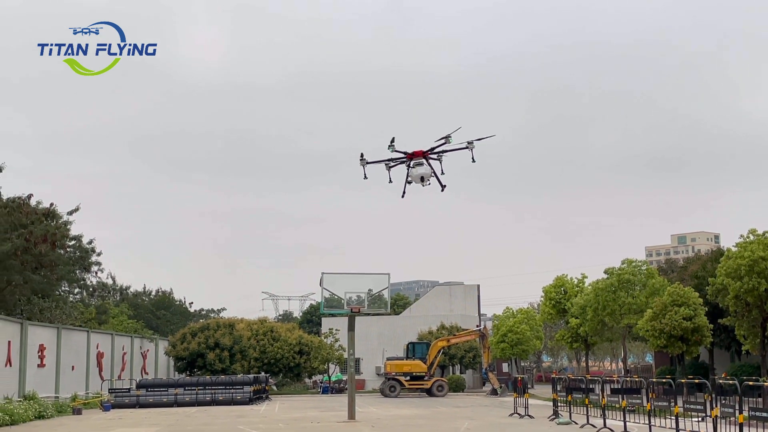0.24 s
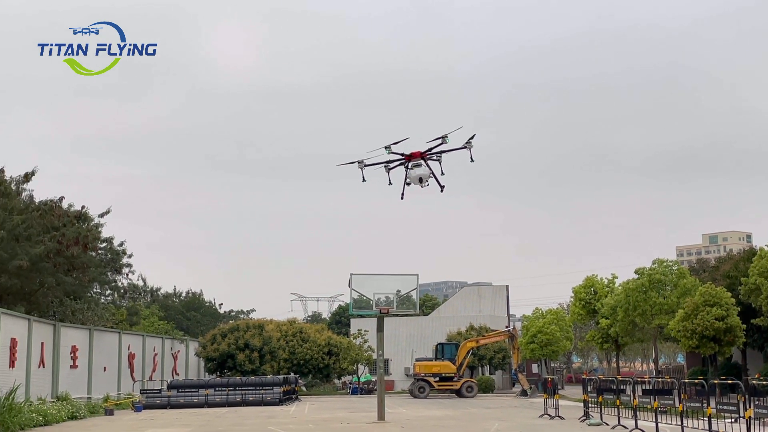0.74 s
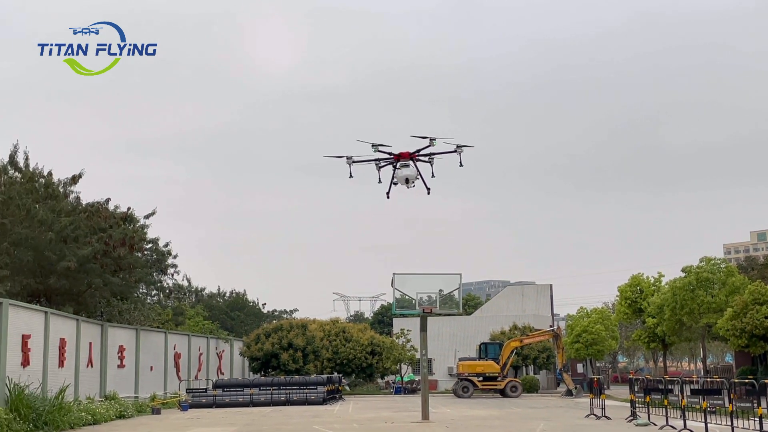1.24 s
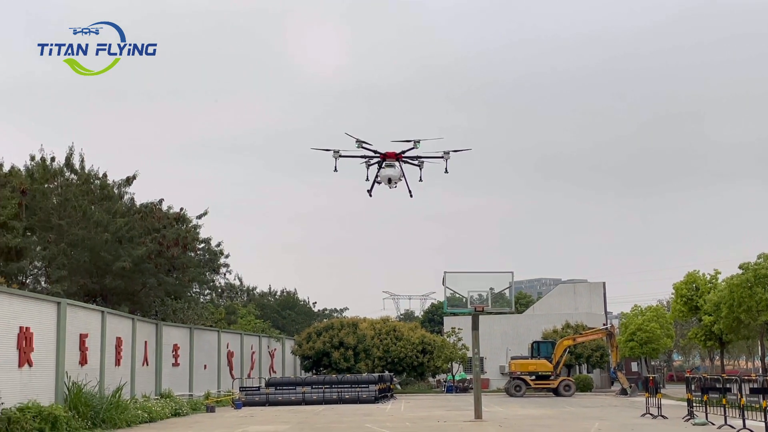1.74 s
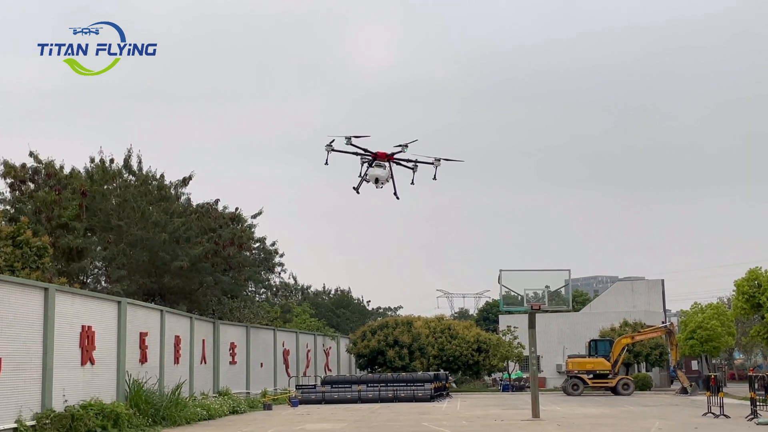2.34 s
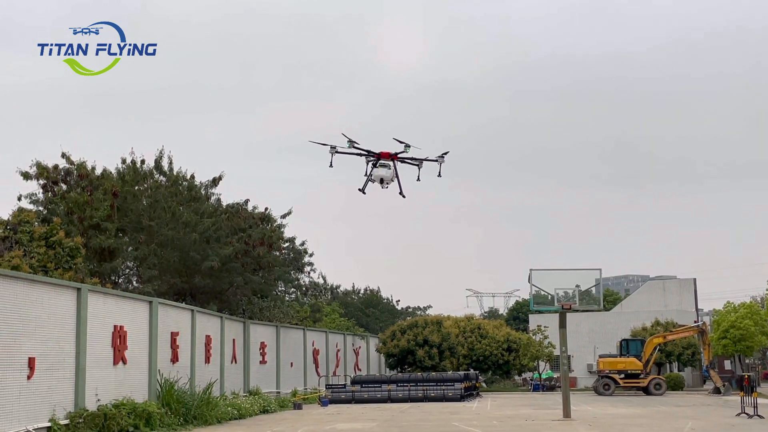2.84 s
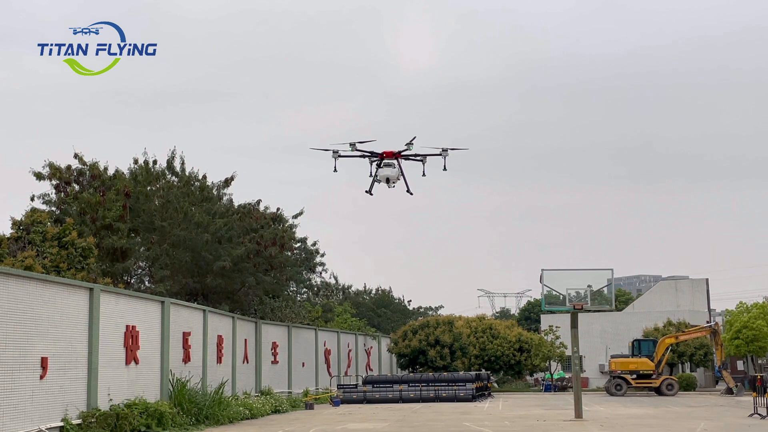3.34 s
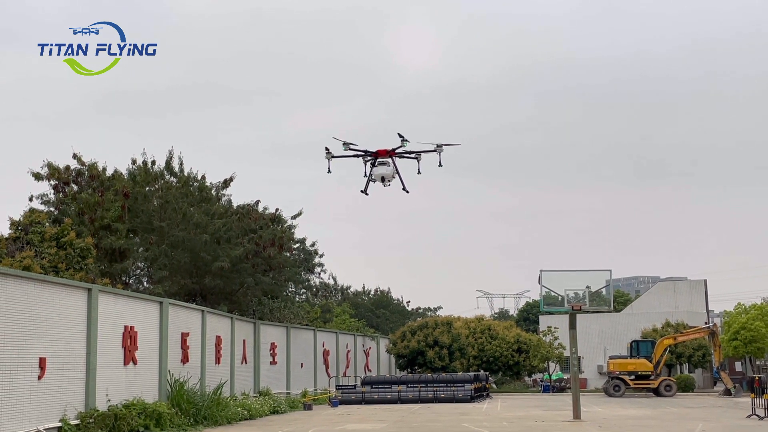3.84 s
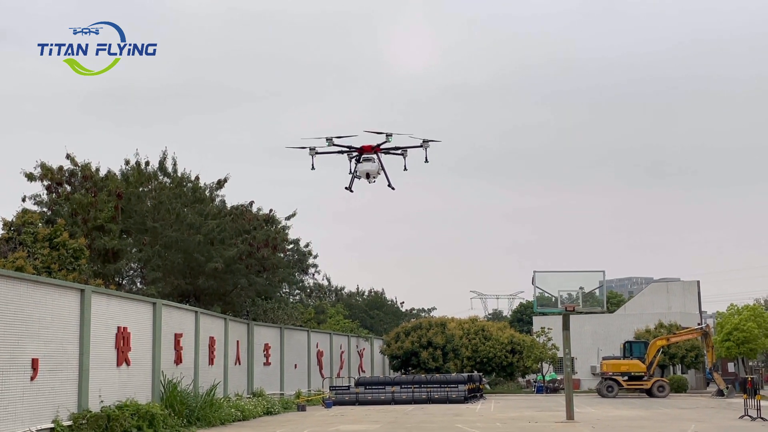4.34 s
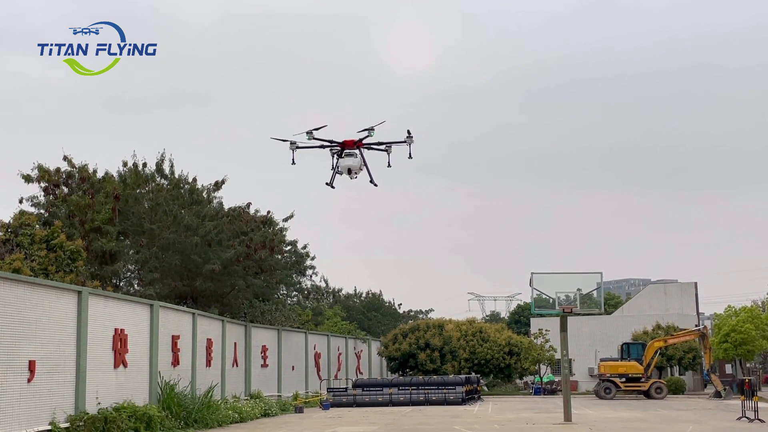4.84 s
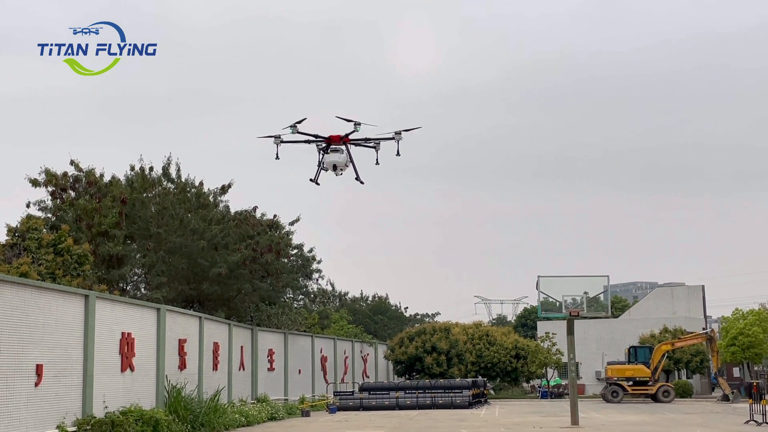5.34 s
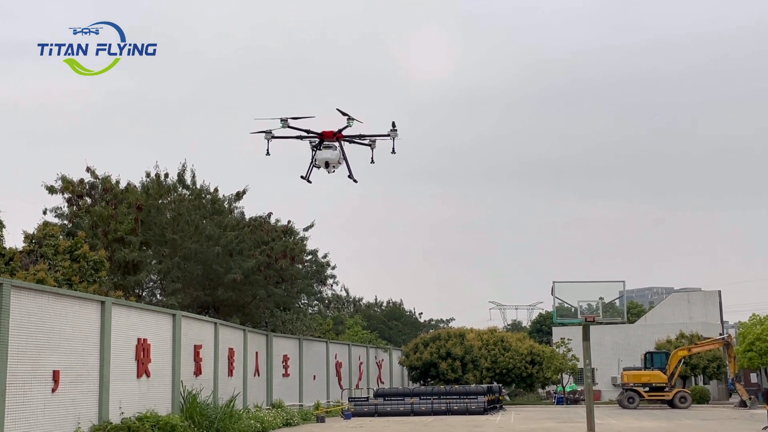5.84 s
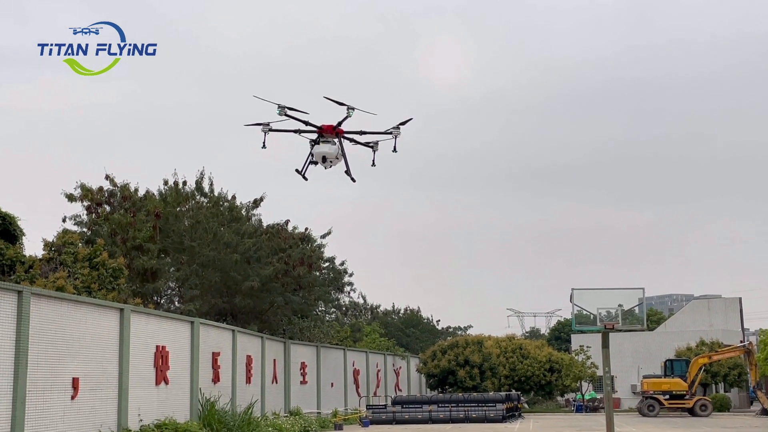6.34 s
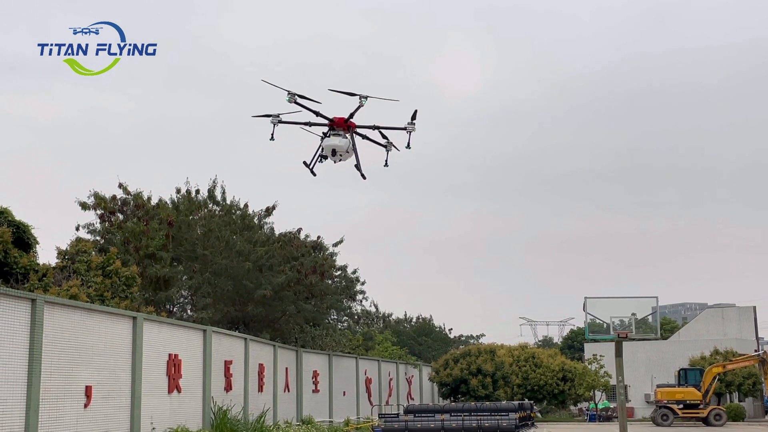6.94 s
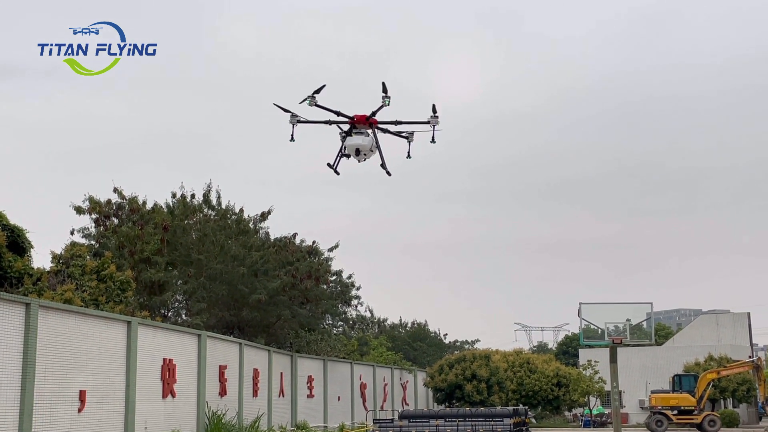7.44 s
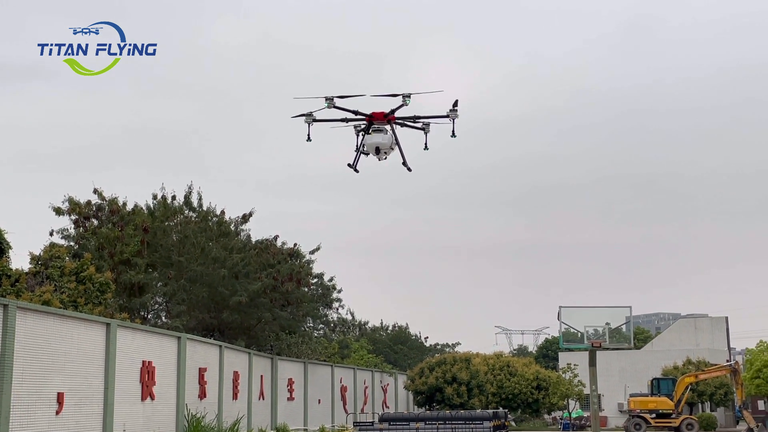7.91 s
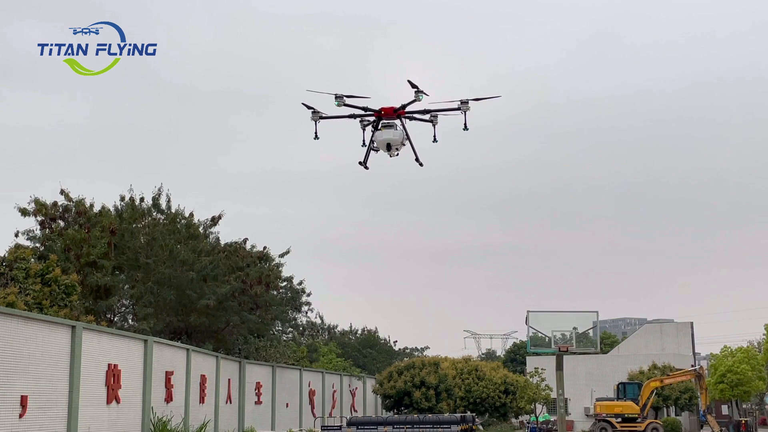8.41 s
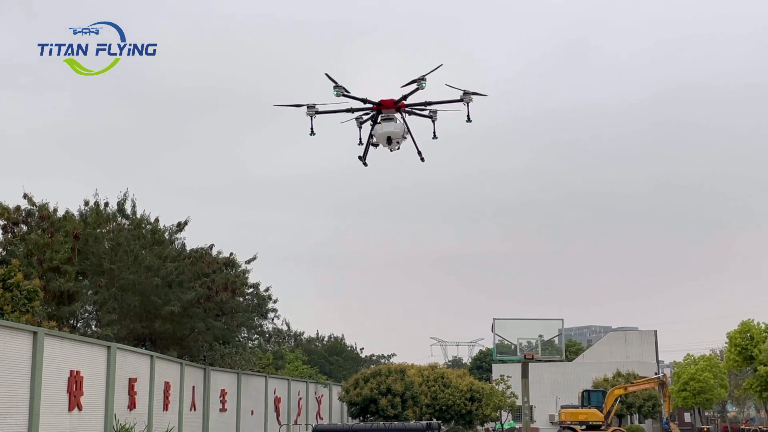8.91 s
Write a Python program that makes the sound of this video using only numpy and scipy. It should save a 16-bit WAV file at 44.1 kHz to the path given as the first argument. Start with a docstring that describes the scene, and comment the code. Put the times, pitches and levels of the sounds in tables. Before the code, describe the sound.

A six-rotor drone hovers over a paved yard, heard from the ground outdoors throughout. From 0 s there is a steady low hum near 57 blade beats per second, raspy buzz and airy swish, its rotors beating slowly against each other, with thin wavering motor whines and a very high electric whine. Soft wind gusts rumble at the start and around 1.6 s. Between 1 and 3 s the blade chop grows crisper and crackly; a tiny hollow blip passes at 2 s. From 2.6 to 3.2 s wind thumps the microphone in a cluster. From 3.3 to 5 s wind mostly calms and the buzz is softer, motor tones singing through. From 5.5 s the hum deepens and swells, with a rough pulsing roar strongest around 6.4 to 7.1 s, brief slaps, and wind thumps at 7.2 to 7.6 s. It stays close and full, chopping again near 8.7 s, still running at 9.2 s.

```python
"""A paved yard: a six-rotor spraying drone hovers low and drifts closer.
Each blade pass fires a pressure pulse for the rasp and hum, and shapes noise into swish, slaps and roar.
Rotor pairs at unequal speeds beat together; motors and drives add thin, gliding whines.
A delayed ground copy combs the buzz; noise and sharp pressure dips make wind rumble and thump on the mic."""
import sys
import numpy as np
from scipy import signal
from scipy.fft import rfft, irfft, next_fast_len
from scipy.io import wavfile
from scipy.ndimage import uniform_filter1d

SR = 44100
rng = np.random.default_rng(int(sys.argv[2]) if len(sys.argv) > 2 else 0)


def materialize(psi):
    """Save the field psi as 16-bit PCM at rate SR to the path in sys.argv[1].

    A 1-D psi becomes a single channel; in a 2-D psi each row is a channel.
    """
    bounded = np.clip(np.atleast_2d(psi).T, -1, 1)
    quanta = np.round(bounded * 32767).astype(np.int16)
    wavfile.write(sys.argv[1], SR, quanta)


N = 404220
TIME = np.arange(N) / SR

# Wind on the microphone, before flutter and gusts: t/s, level/dB
BREEZE_LEVEL = [(0, -33.5), (.9, -35.5), (1.4, -35), (1.9, -34), (2.3, -30.5), (2.6, -31), (3.2, -32.5),
                (3.32, -40.5), (4.5, -41.5), (4.8, -35), (5.3, -37.5), (6, -33), (6.7, -33.5), (7.3, -30),
                (7.6, -31.5), (7.9, -30.5), (8.3, -35.5), (8.7, -33.5), (9.17, -37.5)]
# Single gusts on top of the breeze: t/s, bell width/s, level/dB
GUST_SWELLS = [(.06, .15, -24.5), (.522, .066, -31), (.833, .15, -31), (1.636, .095, -24.5),
               (2.004, .037, -27), (2.776, .06, -26), (3.002, .035, -29), (4.76, .048, -35),
               (5.78, .23, -42), (7.25, .1, -29), (7.55, .065, -22.5), (8.47, .041, -26),
               (8.944, .032, -27)]
# Eddies that hit the microphone: t/s, peak level before trim/dB, dip width/ms
EDDIES = [(2.644, -22, 3), (2.704, -16.5, 0.69), (2.717, -11, 2.6), (2.741, -27, 1.5), (2.762, -15, 3),
          (2.774, -22, 3), (2.787, -14, 0.89), (2.801, -15, 1.2), (2.826, -18, 2.4), (2.883, -17.5, 4.9),
          (2.957, -21, 3), (2.99, -24, 4.6), (3.007, -9.5, 1.7), (3.141, -21, 5.1), (3.184, -22, 1.4),
          (3.202, -19, 2.4), (3.212, -14, 1.2), (3.228, -19, 0.65), (3.65, -24, 0.71), (3.85, -28, 0.88),
          (7.168, -16, 2), (7.269, -17, 2), (7.331, -17, 1.2), (7.495, -19, 2.3), (7.526, -17, 6.5),
          (7.582, -20, 5.1), (8.102, -17, 2)]
# Colours of light air, of a gust and of an eddy's puff: f/Hz, relative level/dB
LIGHT_AIR_COLOUR = [(10, -50), (35, -18), (60, -1), (90, 5), (115, 7.5), (160, -1), (250, -6), (600, -28),
                    (4000, -120)]
GUST_COLOUR = [(10, -50), (30, -7), (42, 5), (52, 4.5), (59, 15.5), (68, 12), (90, 3), (150, -20),
               (1500, -120)]
PUFF_COLOUR = [(20, -50), (70, -5), (130, 26), (300, 32), (450, 11), (800, -4), (4000, -120)]
# Short hollow note: f/Hz, level/dB
NOTE_TONES = [(673, -30.5), (560, -34)]
# Stereo width by frequency, almost mono from 3 to 14 kHz: f/Hz, difference against sum/dB
STEREO_WIDTH = [(60, -25.5), (125, -11), (370, -13.5), (530, -7.5), (1090, -12), (1570, -10.5), (1850, 0.5),
                (2150, -17.5), (3000, -82), (5800, -64), (6800, -94.5), (14000, -65)]
# Phase of the left port over the right: f/Hz, phase/rad
PORT_PHASE_LEAD = [(6100, 0), (7400, 1.8), (8300, 3.1), (9500, 4.5), (10900, 6.28), (12300, 6.28),
                   (13300, 7.9), (14000, 9.3)]

# Rotor pairs part in speed to steer: t/s, blade passes of leading pair/Hz, fast pair/Hz, slow pair/Hz
PAIR_SPEEDS = [(0, 57, 58.5, 56.2), (.4, 57.2, 59, 56.3), (.65, 57.1, 58.4, 57.5), (1, 57.3, 57.5, 57.2),
               (1.3, 57.4, 57.6, 56.7), (1.65, 57.4, 57.4, 56.1), (1.87, 56.8, 57.5, 56.1),
               (2.05, 58.3, 57.6, 56), (2.3, 58.2, 57.3, 56.1), (2.5, 57.5, 57.3, 56.3),
               (2.8, 57.2, 57.25, 57.1), (3.1, 57.1, 57.7, 56.9), (3.35, 57.1, 58.3, 56.2),
               (3.7, 56.9, 58.7, 55.2), (4.1, 56.8, 59.2, 55.5), (4.8, 56.4, 58.8, 55.4),
               (5.55, 55.5, 59.7, 54.9), (5.9, 55.8, 61.1, 54.6), (6.25, 57.3, 62.8, 53.5),
               (6.6, 58.2, 61.8, 53.1), (7.3, 57.4, 60.9, 54.9), (7.5, 56.9, 61.6, 55),
               (8.1, 56.8, 60.3, 53.7), (8.6, 57.05, 58.8, 53.4), (9.17, 57, 58.5, 55.7)]
# Fast pair against the leading pair: t/s, relative level/dB
FAST_PAIR_LEVEL = [(0, -4), (5, -7), (6.2, 4.5), (7.3, 2.5), (8, -1), (9.17, -1)]
# Ground echo, later as the drone nears: t/s, delay/ms, strength/ratio
GROUND_ECHO = [(0, 2.23, 0.36), (2, 2.37, 0.23), (4, 2.41, 0.22), (5.4, 2.6, 0.37), (6.5, 2.83, 0.32),
               (7.4, 3.06, 0.26), (9.17, 3.24, 0.36)]

# Steady motor tones, before the common trim: f/Hz, level/dB
MOTOR_TONES = [(1928, -58.5), (1971, -57), (2017, -59), (2086, -60), (2918, -60.5), (3003, -65),
               (3110, -69), (3414, -67), (3495, -65), (3530, -64), (3620, -67)]
# Motor tones that sing out, before the common trim: t/s, bell width/s, f/Hz, glide/(Hz/s), level/dB
SINGING_TONES = [(.15, .35, 3617, -30, -57), (.25, .45, 3015, -25, -58), (1, .5, 3494, -12, -56.5),
                 (.9, .5, 3528, 10, -57), (1.2, .5, 2917, -10, -55.5), (2.2, .5, 2998, -10, -54.5),
                 (2.3, .4, 2086, 0, -55), (3.2, .6, 3412, -12, -60), (4.4, .5, 3623, 8, -56.5),
                 (5, .6, 3537, -14, -57.5), (5.2, .5, 3418, 8, -58), (4.5, .7, 4134, -20, -61),
                 (4.8, .5, 3018, -22, -55), (5.2, .6, 3027, -14, -54), (4.9, .6, 4048, 12, -61),
                 (5, .55, 3112, 18, -57), (5.3, .6, 2923, 14, -57), (6.2, .45, 2020, -15, -52),
                 (6.4, .3, 3530, 25, -56), (6.55, .25, 3025, -20, -56), (7.95, .27, 3617, -15, -54)]
# Drive whine before trim: t/s, level/dB
DRIVE_LEVEL = [(0.0, -47), (0.15, -50), (0.89, -50), (1.15, -58), (2.32, -50), (3.06, -57), (3.45, -50),
               (4.9, -49), (5.05, -54), (5.13, -47), (5.57, -55), (6.02, -51), (7.86, -52.5), (8.73, -48.5),
               (9.11, -52), (9.17, -46)]
# Lines below the switching tone: multiple of the blade rate/count, relative level/dB
DRIVE_SIDEBANDS = [(24, -22), (20, -2), (18, -13), (16, 0), (14, -6), (12, -8), (10, -11), (8, -16)]
# Colour of the faint blur around the whine: f/Hz, relative level/dB
BLUR_COLOUR = [(12700, -60), (13050, -7), (13300, 0), (13700, -3), (14100, -60)]

# Roar of the wake as the drone brakes: t/s, level/dB
SURGE_LEVEL = [(5.2, -60), (5.8, -43), (6.4, -35), (7.1, -36), (7.6, -45), (9.17, -47)]
# Colour of that roar: f/Hz, relative level/dB
WAKE_COLOUR = [(30, -50), (200, -19), (290, 0.5), (370, 8.5), (470, -10.5), (600, 1.5), (740, -5.5),
               (880, -16.5), (1130, -9), (1500, -36), (4000, -40)]
# Slaps as blades cut a neighbour's wake: t/s, bell width/s, level before trim/dB
SLAP_RUNS = [(.72, 0.19, -4.5), (2.32, 0.078, -5), (6.71, 0.07, -3), (7.237, 0.048, 0.5), (8.09, 0.029, -1)]
# Sharp crack per blade pass, before trim: t/s, leading rotor peak level/dB, slow level/dB, fast level/dB
CRACK_LEVELS = [(0, -40, -31, -42), (.5, -40, -30, -42), (1, -31, -26, -40), (1.3, -26, -28, -40),
                (1.7, -27, -31, -42), (2.05, -21.5, -35, -42), (2.4, -23, -33, -40), (2.7, -21.5, -29, -38),
                (3, -25, -28, -38), (3.3, -34, -28, -42), (3.8, -36, -28, -42), (4.1, -34, -37, -42),
                (4.9, -34, -42, -42), (5.4, -38, -34, -32), (6.5, -29, -29, -27), (7.3, -27, -31, -30),
                (7.9, -36, -30, -36), (8.4, -28, -34, -36), (8.75, -21, -34, -37), (9.17, -32, -30, -36)]
# Colour of a crack: f/Hz, relative level/dB
CRACK_COLOUR = [(30, -40), (300, -14), (700, -2), (1200, -1), (2500, 0), (4000, -3.5), (6000, -11),
                (8000, -24), (14000, -50)]

# Drone layers before trims: t/s, blade rasp level/dB, swish level/dB, top hiss level/dB
AIR_LEVELS = [(0.0, -38, -39.5, -58), (0.15, -39.5, -40.5, -60), (1.28, -34.5, -43.5, -59),
              (1.5, -38.5, -43.5, -59.5), (2.37, -40.5, -41.5, -56.5), (2.86, -36.5, -45.5, -60),
              (3.27, -39.5, -41, -58), (3.96, -41, -45, -59), (5.08, -41, -46.5, -58),
              (5.57, -43.5, -41.5, -59), (5.82, -42, -44, -57.5), (6.48, -36.5, -40, -54.5),
              (7.48, -38, -40, -54.5), (7.56, -38.5, -41.5, -55.5), (8.91, -38, -38, -54.5),
              (9.17, -49, -38.5, -54.5)]
# Churn against the rasp: t/s, relative level/dB
CHURN_LEVEL = [(0, -1), (1.1, -4), (1.7, -3), (2.05, 3), (2.35, 2), (2.6, -5), (3.3, -3), (3.7, 0),
               (4.6, -1.5), (6.5, -1.5), (7.4, 0), (9.17, 0)]
# How far the leading rotor's chop stands out: t/s, relative level/dB
CHOP_LEVEL = [(0, -8), (1.1, 0), (1.95, 7), (2.25, 11), (2.5, 6), (2.7, 11), (3.25, -14), (3.85, 11),
              (4.2, -3), (4.55, 10), (5, -5), (6.9, -16), (7.25, 1), (7.6, -18), (8.4, 11), (8.7, 15),
              (9.17, 7)]
# Colours of the churn, the swish and the rasp: f/Hz, relative level/dB
CHURN_COLOUR = [(30, -48), (100, -38), (200, 6.5), (330, -0.5), (500, 5), (700, -9), (1100, -11),
                (1600, -28), (2500, -22), (8000, -58)]
SWISH_COLOUR = [(60, -43), (400, 3.5), (900, 6), (1600, 5), (1870, -1), (2100, 4.5), (2500, 3.5), (3300, 0),
                (4200, -3), (5000, -6), (7000, -9.5), (8300, -16.5), (10600, -13.5), (12500, -22),
                (14000, -21)]
RASP_COLOUR = [(30, -57), (200, -5), (400, 6.5), (600, 2.5), (800, 7.5), (1200, 4), (1700, -1.5),
               (3000, -8), (6000, -22), (14000, -60)]
# Low hum before trim: t/s, level/dB, lift of its three lowest harmonics before levelling/dB
HUM_LEVELS = [(0, -37, -5), (1.1, -36.5, 3.5), (2.3, -36, 4), (3, -36, 5), (4.6, -37.5, -10),
              (5.6, -34, -5), (6.5, -31, -2), (7.4, -33.5, 0), (8, -35, -1), (9.17, -33, -7)]
# Harmonic colour of the hum: f/Hz, relative level/dB
HUM_COLOUR = [(57, -11), (115, -4.5), (172, 1.5), (230, -7), (287, -4), (343, -3.5), (400, 0), (458, -3),
              (515, -11.5), (575, -7), (660, -23.5), (745, -13), (810, -14.5), (950, -18)]
# How much the downwash stirs the hum: t/s, phase wander/rad
HUM_UNREST = [(0, .15), (1.7, .15), (2.05, .55), (2.5, .15), (5.2, .15), (6.1, .55), (7.2, .55), (7.8, .45),
              (9.17, .4)]

RASP_DB, HUM_DB, WHINE_DB = -2, 0.5, 2.5   # layer trims
MOTOR_DB, MOTOR_FOLLOWS = 2.5, 0.55   # trim, and share of the swish's dB swing that the motors follow
SWITCHING_HZ, WHINE_BLUR_DB = 14225, -4   # blur against the clean lines
TONE_FLUTTER_DB, TONE_GLIDE_HZ, TONE_WAVER_HZ = 2.2, 4, 2.6   # spread of sway in level, slow and quick pitch
PAIR_SPLIT_SHARE = .13   # lag of each far rotor, as a share of the fast-slow speed gap
PASS_UNEVEN_DB = 0.9   # spread of the quick changes in swish power
HARMONIC_SWAY_DB, HARMONIC_SWAY_HZ = 2.2, 2.2
FLUTTER_DB, FLUTTER_RATE_HZ = 2.0, 6
CUTOFF_HZ = 14000


def from_db(db):
    """Decibels to gain."""
    return 10 ** (np.asarray(db) / 20)


def rms_one(x):
    """Scale to unit power."""
    return x / np.sqrt(np.mean(x ** 2) + 1e-20)


def levelled(x, seconds):
    """Hold a stereo sound at unit power over a sliding window."""
    power = uniform_filter1d(np.mean(x ** 2, axis=0), int(seconds * SR))
    return x / np.sqrt(power + 1e-12)


def in_time(rows):
    """Draw each column of a table as a curve, sample by sample."""
    s, *columns = np.transpose(rows)
    return [np.interp(TIME, s, column) for column in columns]


def at_hz(points, hz):
    """Read a spectrum on a log-frequency axis."""
    known_hz, values = np.transpose(points)
    return np.interp(np.log(hz + 1), np.log(known_hz), values)


def swell(at_s, length_s):
    """A bell-shaped rise and fall, 1 at the top."""
    return np.exp(-((TIME - at_s) / length_s) ** 2)


def drift(rate_hz):
    """Smooth random wandering of unit rms: noise through two equal low-pass poles."""
    step = 40   # samples between drawn points
    pole = np.exp(-2 * np.pi * rate_hz * step / SR)
    raw = rng.standard_normal(N // step + 2002)
    slow = signal.lfilter([1], [1, -2 * pole, pole * pole], raw)[2000:]   # skip the filter's start
    return np.interp(np.arange(N) / step, np.arange(len(slow)), rms_one(slow))


def coloured(mid, side, spectrum):
    """Give a sum and a difference signal a spectrum and the width set by STEREO_WIDTH, at unit power."""
    size = next_fast_len(N + SR // 10)
    hz = np.arange(size // 2 + 1) * SR / size
    width = from_db(at_hz(STEREO_WIDTH, hz))
    left_right = rfft(rms_one(mid), size) + width * rfft(rms_one(side), size) * [[1], [-1]]
    shaped = left_right * from_db(at_hz(spectrum, hz))
    return rms_one(irfft(shaped, size)[:, :N])


def noise(spectrum, envelope=1):
    """Stereo turbulence: coloured random noise under an envelope."""
    mid, side = envelope * rng.standard_normal((2, N))
    return coloured(mid, side, spectrum)


def scattered(x, t60):
    """Wall and trees return a thin random spray of decaying echoes."""
    t = np.arange(SR // 2) / SR
    sparse = (rng.random(len(t)) < .01) * (t > .008)
    echoes = rng.standard_normal(len(t)) * sparse * from_db(-60 * t / t60)
    return rms_one(signal.fftconvolve(x, echoes)[:N])


def note(at_s, length_s):
    """A soft, hollow note: two sines that swell and die at once."""
    tones = sum(from_db(db) * np.sin(2 * np.pi * hz * TIME) for hz, db in NOTE_TONES)
    return swell(at_s, length_s) * tones


def rumble(calm_db, deepening):
    """Light air flutters on the microphone; stronger wind shifts its noise towards a deep throb."""
    breeze_db, = in_time(BREEZE_LEVEL)
    breeze = from_db(breeze_db + FLUTTER_DB * drift(FLUTTER_RATE_HZ))
    gusts = sum(from_db(db) * swell(s, length) for s, length, db in GUST_SWELLS)
    strength = np.hypot(breeze, gusts)
    deep_share = 1 / (1 + (from_db(calm_db) / strength) ** deepening)
    air = np.sqrt(deep_share) * noise(GUST_COLOUR) + np.sqrt(1 - deep_share) * noise(LIGHT_AIR_COLOUR)
    return strength * levelled(air, seconds=.1)


def buffets(trim_db, low_hz, top_hz, puff_db, puff_s):
    """Each eddy is a sharp pressure dip with a dull puff; the microphone's bass cut makes it swing back."""
    thumps, puffs = 0, 0
    bass_cut = signal.butter(2, low_hz, "high", fs=SR, output="sos")
    top_cut = signal.butter(4, top_hz, fs=SR, output="sos")
    response = np.vstack([bass_cut, top_cut])
    t = np.arange(-SR // 20, SR // 10) / SR
    for s, db, width_ms in EDDIES:
        dip = -np.exp(-abs(t) * 1000 / width_ms)
        knock = signal.sosfilt(response, dip)
        knock = knock / abs(knock).max()
        thumps = thumps + from_db(db + trim_db) * np.interp(TIME, s + t, knock, 0, 0)
        puffs = puffs + from_db(db) * swell(s, puff_s) / width_ms   # sharper dips puff louder
    return thumps + from_db(puff_db) * puffs * noise(PUFF_COLOUR)


def rotors(far_db, slow_db, hunt_hz, sway_db):
    """Six rotors as (blade passes so far, gain): fast, leading, slow pairs; far ones lag and hunt more."""
    six = []
    fast_db, = in_time(FAST_PAIR_LEVEL)
    leading, fast, slow = in_time(PAIR_SPEEDS)
    split = PAIR_SPLIT_SHARE * (fast - slow)
    for speed, pair_db in zip((fast, leading, slow), (fast_db, 0, slow_db)):
        # near rotor, then far rotor
        for rotor_db, lag, hunt in ((0, 0, hunt_hz / 2), (far_db, split, hunt_hz)):
            passes = rng.random() + np.cumsum(speed - lag + hunt * drift(1.91)) / SR
            gain = from_db(pair_db + rotor_db + sway_db * drift(1))
            six.append((passes, gain))
    return six


def blade_pulses(passes, jitter_ms, uneven_db):
    """One pulse per blade pass, each a little different in time and strength."""
    at = np.interp(np.arange(np.ceil(passes[0]), passes[-1]), passes, np.arange(N))
    timing, strength = rng.standard_normal((2, len(at)))
    at = np.clip(at + timing * jitter_ms * SR / 1000, 0, N - 1).astype(int)
    return np.bincount(at, from_db(uneven_db * strength), N)


def motors():
    """Fine electric tones that waver in pitch and level, some singing out for a while."""
    def tone(hz):
        """One sine with wandering pitch and level, at about unit power."""
        flutter = rms_one(from_db(TONE_FLUTTER_DB * drift(4.0)))
        pitch = hz + TONE_GLIDE_HZ * drift(.6) + TONE_WAVER_HZ * drift(13.0)
        return np.sqrt(2) * flutter * np.sin(2 * np.pi * np.cumsum(pitch) / SR)

    steady = sum(from_db(db) * tone(hz) for hz, db in MOTOR_TONES)
    singing = sum(from_db(db) * swell(s, length) * tone(hz + glide * (TIME - s))
                  for s, length, hz, glide, db in SINGING_TONES)
    return steady + singing


def drives(six, waver_hz, others_db):
    """The drives' switching whine: its sidebands sink as a rotor speeds up, over a faint noise blur."""
    clean = 0
    for (passes, gain), drive_db in zip(six[::2], (others_db, 0, others_db)):
        carrier = np.cumsum(SWITCHING_HZ + waver_hz * drift(58.5)) / SR
        lines = sum(from_db(db) * np.sin(2 * np.pi * (carrier - k * passes)) for k, db in DRIVE_SIDEBANDS)
        clean = clean + gain * from_db(drive_db) * lines
    return rms_one(rms_one(clean) + from_db(WHINE_BLUR_DB) * noise(BLUR_COLOUR))


def surge(six, depth):
    """While the drone brakes, the blades churn through their own wake: a rough, pulsing roar."""
    level_db, = in_time(SURGE_LEVEL)
    pulsing = np.exp(depth * sum(np.cos(2 * np.pi * passes) for passes, _ in six[::2]))
    return from_db(level_db) * noise(WAKE_COLOUR, pulsing)


def slaps(six, slap_db, crack_s):
    """Short runs of slaps: a decaying burst of torn air at each pass of the leading blade."""
    passes, _ = six[2]
    since_pass_s = passes % 1 / np.gradient(passes) / SR
    strength = sum(from_db(db) * swell(s, length) for s, length, db in SLAP_RUNS)
    return from_db(slap_db) * strength * noise(SWISH_COLOUR, np.exp(-since_pass_s / crack_s))


def cracks(six, trim_db, direct_db):
    """A blade cuts a tip vortex: one spike per pass, aimed downward, so its ground echo is the stronger."""
    delay_ms, _ = in_time(GROUND_ECHO)
    spike = np.fft.fftshift(irfft(from_db(at_hz(CRACK_COLOUR, np.arange(257) * SR / 512))))
    trains = 0
    for (passes, _), db in zip((six[2], six[4], six[0]), in_time(CRACK_LEVELS)):
        trains = trains + from_db(db + trim_db) * blade_pulses(passes, jitter_ms=.02, uneven_db=1.3)
    spikes = signal.oaconvolve(trains, spike / spike.max(), "same")
    echo = np.interp(TIME - delay_ms / 1000, TIME, spikes)
    return from_db(direct_db) * spikes + echo


def swish(six, churn_db, swish_db, hiss_db, sharpness, steady, hiss_hz):
    """Air tears off each blade, loudest as it sweeps towards the listener; the top is a smoother hiss."""
    chop_db, = in_time(CHOP_LEVEL)
    sweeps = [gain * np.exp(sharpness * (np.cos(2 * np.pi * passes) - 1)) for passes, gain in six]
    power = sum(sweeps[:2] + sweeps[3:]) + from_db(chop_db) ** 2 * sweeps[2]
    power = power * from_db(PASS_UNEVEN_DB * drift(45))   # no two passes tear off alike
    envelope = np.sqrt(steady + power / uniform_filter1d(power, SR // 4))
    low = signal.butter(2, hiss_hz, "low", fs=SR, output="sos")
    high = signal.butter(2, hiss_hz, "high", fs=SR, output="sos")
    churn = from_db(churn_db) * noise(CHURN_COLOUR, envelope)
    air = from_db(swish_db + 3.5) * signal.sosfilt(low, noise(SWISH_COLOUR, envelope))
    hiss = from_db(hiss_db + 22.0) * signal.sosfilt(high, noise(SWISH_COLOUR))
    return churn + air + hiss


def buzz(six, echo_db):
    """The hard edge of each blade pass gives a rasp, which the yard scatters."""
    pulses = sum(gain * blade_pulses(passes, jitter_ms=0.023, uneven_db=0.8) for passes, gain in six)
    pulses = rms_one(pulses)
    mid = pulses + from_db(echo_db) * scattered(pulses, t60=0.11)
    return coloured(mid, scattered(pulses, t60=.3), RASP_COLOUR)


def hum(six, twin_db, bounce, count=14):
    """Blade loading: low harmonics that beat, combed by the ground echo and stirred by the downwash."""
    out = np.zeros((2, N))
    step = 100   # samples between updates of the harmonic colour
    delay_ms, _ = in_time(GROUND_ECHO)
    _, bass_db = in_time(HUM_LEVELS)
    unrest, = in_time(HUM_UNREST)
    bass = from_db(bass_db)
    delay_s = delay_ms[::step] / 1000
    twin_passes, twin_gain = six[3]   # the leading rotor's partner
    voices = six[::2] + [(twin_passes, twin_gain * from_db(twin_db))]
    for passes, gain in voices:
        speed = np.gradient(passes)[::step] * SR
        for k in range(1, count + 1):
            comb = abs(1 + bounce * np.exp(2j * np.pi * k * speed * delay_s))
            colour = np.repeat(comb * from_db(at_hz(HUM_COLOUR, k * speed)), step)[:N]
            if k <= 3:
                colour = colour * bass
            angle = 2 * np.pi * (k * passes + rng.random()) + unrest * drift(5)
            # opposite phase wander at left and right
            left_right = from_db(at_hz(STEREO_WIDTH, k * speed.mean())) * drift(0.87) * [[1], [-1]]
            # each harmonic swells and fades slowly on its own
            sway = from_db(HARMONIC_SWAY_DB * drift(HARMONIC_SWAY_HZ))
            out += gain * colour * sway * np.sin((angle + left_right).astype(np.float32))
    return levelled(out, seconds=1)


def over_ground(x, dull_hz):
    """The paving returns a late, dulled copy, which combs the spectrum."""
    delay_ms, bounce = in_time(GROUND_ECHO)
    echo = signal.sosfiltfilt(signal.butter(1, dull_hz, fs=SR, output="sos"), x)
    late = np.array([np.interp(TIME - delay_ms / 1000, TIME, side) for side in echo])
    return (x + bounce * late) / np.sqrt(1 + bounce ** 2)


def scene():
    """The drone above the paving, with wind at the microphone and one hollow note."""
    rasp_db, swish_db, hiss_db = in_time(AIR_LEVELS)
    hum_db, _ = in_time(HUM_LEVELS)
    whine_db, = in_time(DRIVE_LEVEL)
    churn_db, = in_time(CHURN_LEVEL)

    wind = rumble(calm_db=-38.5, deepening=2.23)
    wind = wind + buffets(trim_db=-2.5, low_hz=62, top_hz=700, puff_db=-12.5, puff_s=0.0061)

    six = rotors(far_db=-1.5, slow_db=-1.5, hunt_hz=0.1196, sway_db=0.17)
    motor_db = MOTOR_DB + MOTOR_FOLLOWS * (swish_db - swish_db.mean())
    whine = from_db(motor_db) * motors()
    whine = whine + from_db(whine_db + WHINE_DB) * drives(six, waver_hz=7.04, others_db=2)

    air = slaps(six, slap_db=-35.0, crack_s=0.0046)
    air = air + swish(six, rasp_db + churn_db, swish_db, hiss_db, sharpness=1.94, steady=0.28, hiss_hz=5300)
    air = air + from_db(rasp_db + RASP_DB) * buzz(six, echo_db=-4.5)

    drone = whine + surge(six, depth=0.22) + cracks(six, trim_db=-1, direct_db=-5.5)
    drone = drone + over_ground(air, dull_hz=1840)
    drone = drone + from_db(hum_db + HUM_DB) * hum(six, twin_db=-1, bounce=0.44)
    return note(at_s=1.98, length_s=0.014) + wind + drone


def record(dry):
    """The microphone ports drift out of phase in the treble, and a steep filter cuts the top."""
    size = next_fast_len(N + SR // 10)
    hz = np.arange(size // 2 + 1) * SR / size
    spectrum = rfft(dry, size)
    spectrum[1] *= np.exp(-1j * np.interp(hz, *np.transpose(PORT_PHASE_LEAD)))
    top_cut = signal.ellip(12, .2, 80, CUTOFF_HZ, fs=SR, output="sos")
    return signal.sosfilt(top_cut, irfft(spectrum, size)[:, :N])


dry = scene()
out = record(dry)
materialize(out)
```